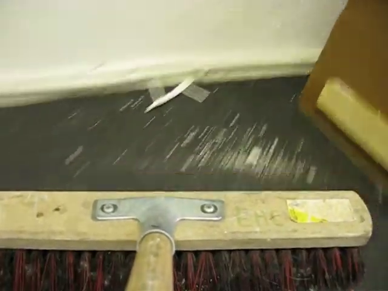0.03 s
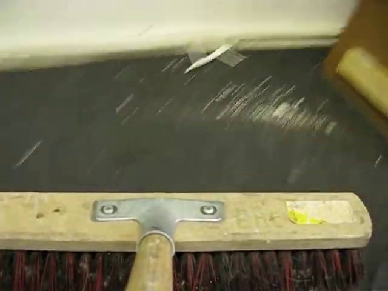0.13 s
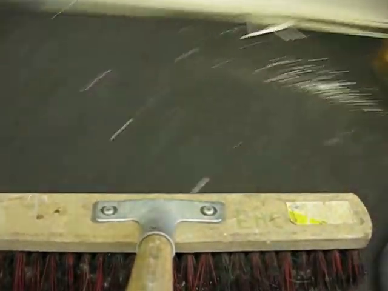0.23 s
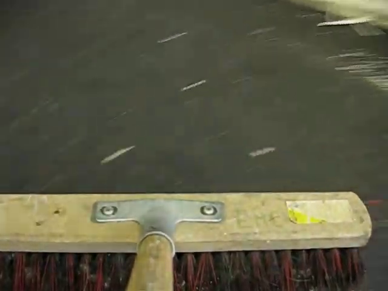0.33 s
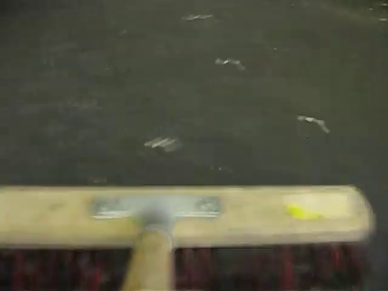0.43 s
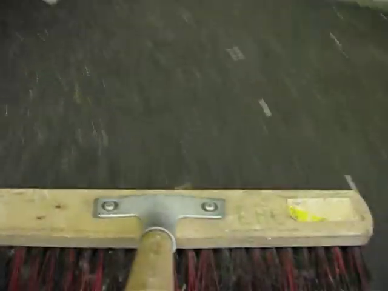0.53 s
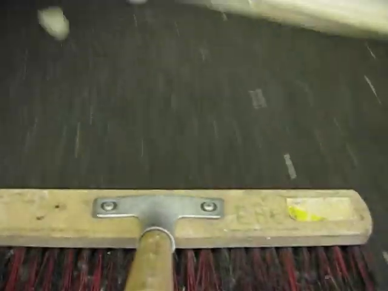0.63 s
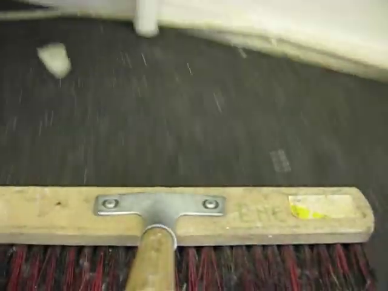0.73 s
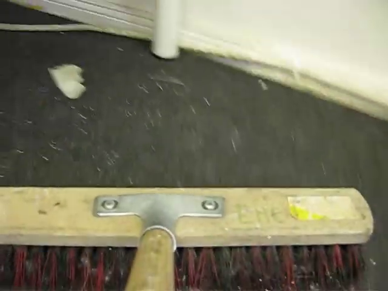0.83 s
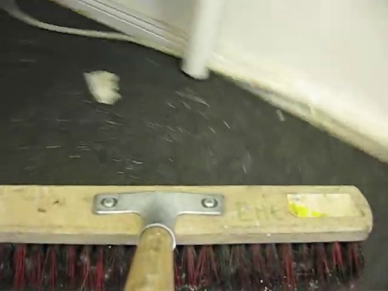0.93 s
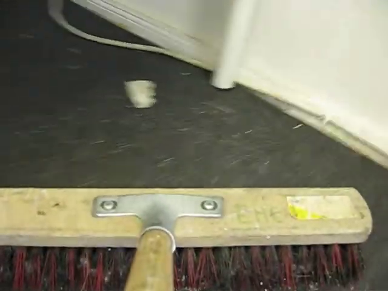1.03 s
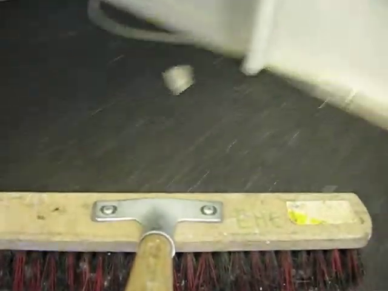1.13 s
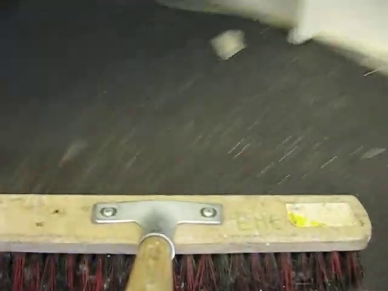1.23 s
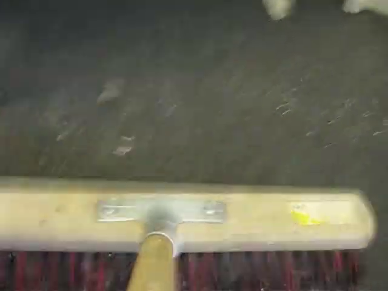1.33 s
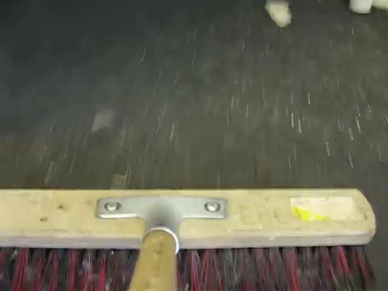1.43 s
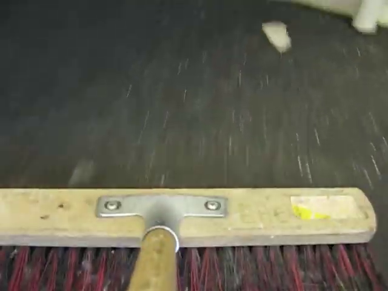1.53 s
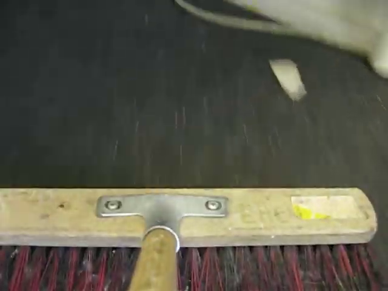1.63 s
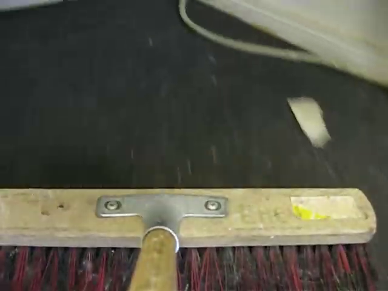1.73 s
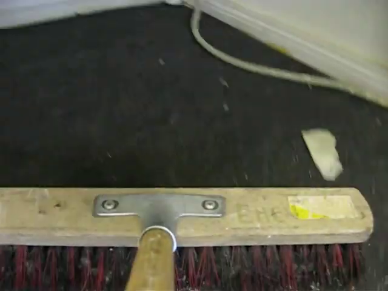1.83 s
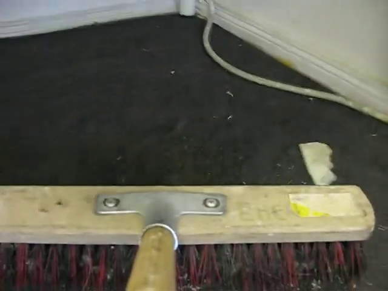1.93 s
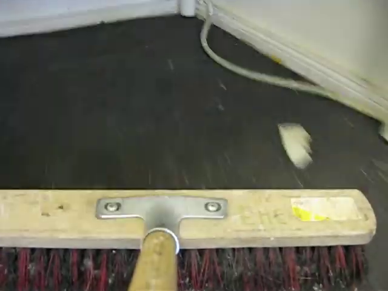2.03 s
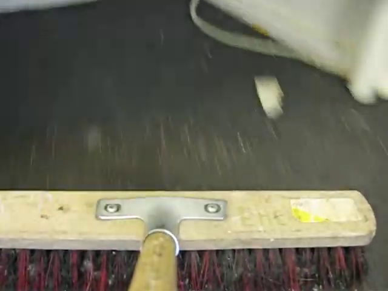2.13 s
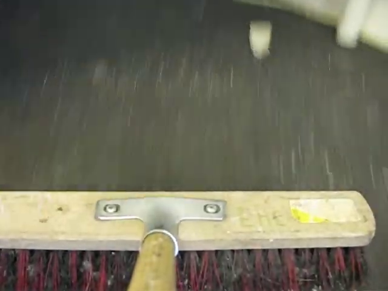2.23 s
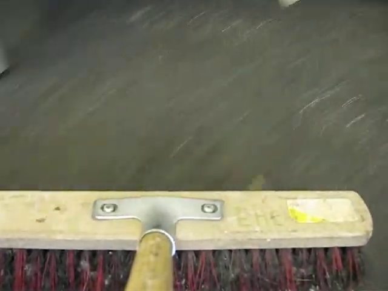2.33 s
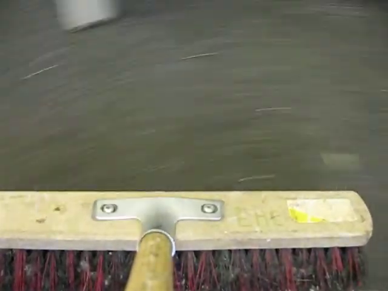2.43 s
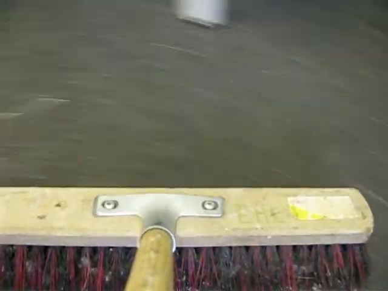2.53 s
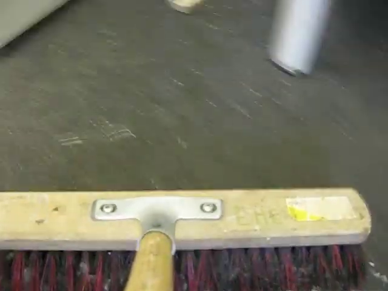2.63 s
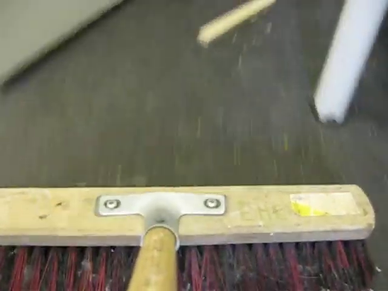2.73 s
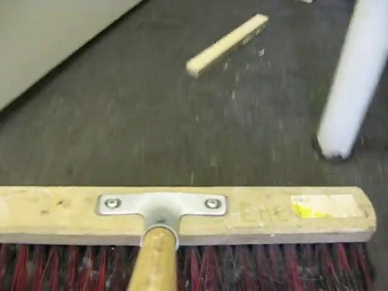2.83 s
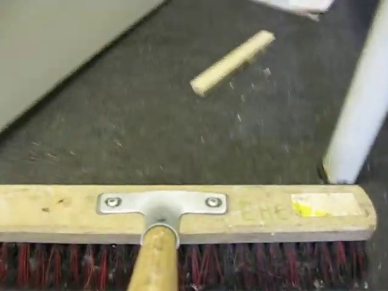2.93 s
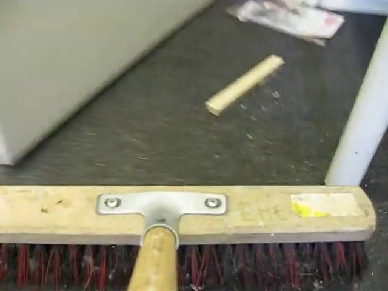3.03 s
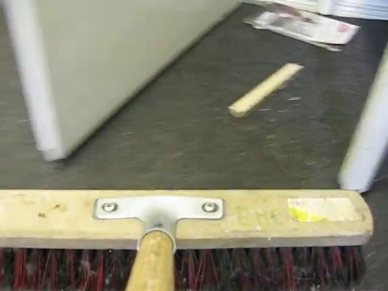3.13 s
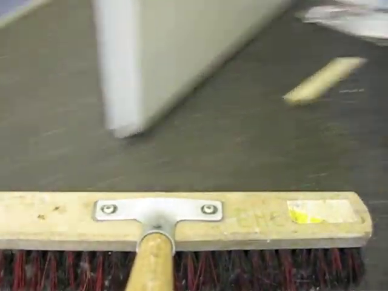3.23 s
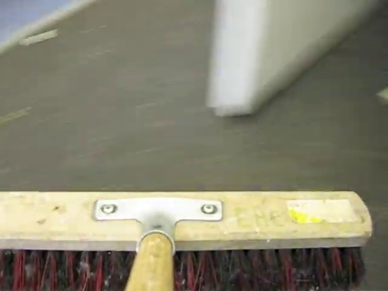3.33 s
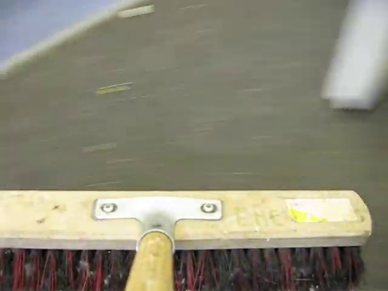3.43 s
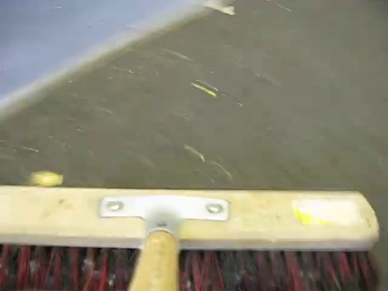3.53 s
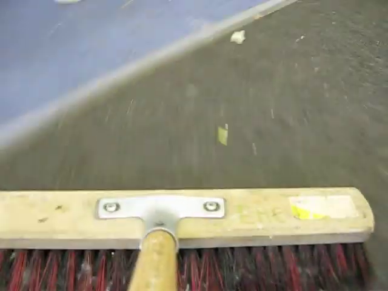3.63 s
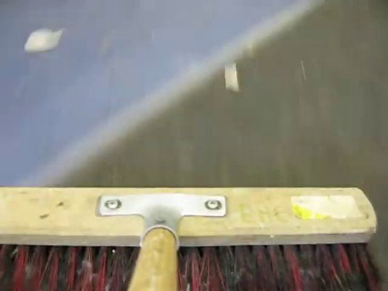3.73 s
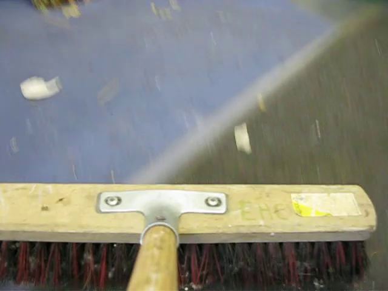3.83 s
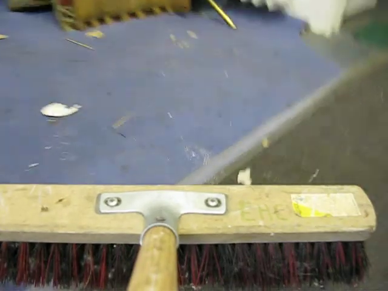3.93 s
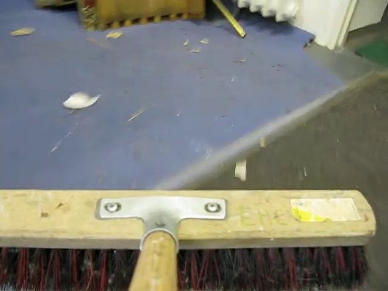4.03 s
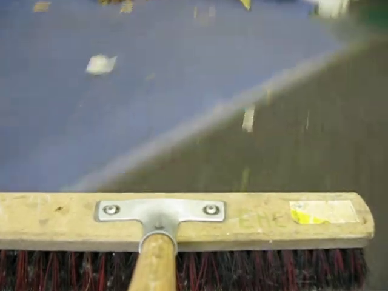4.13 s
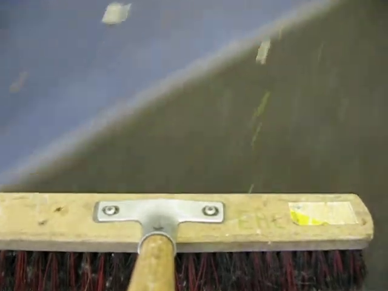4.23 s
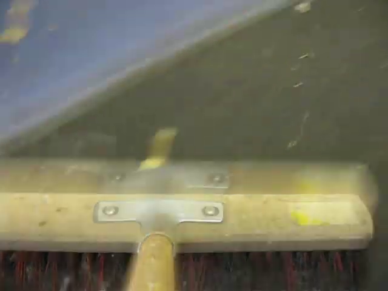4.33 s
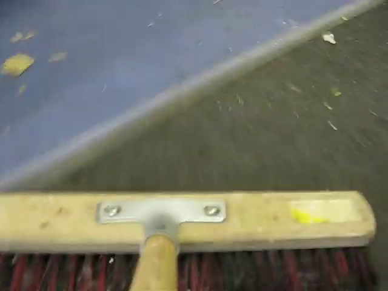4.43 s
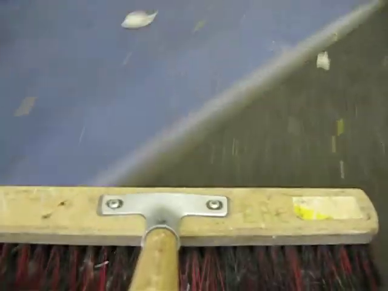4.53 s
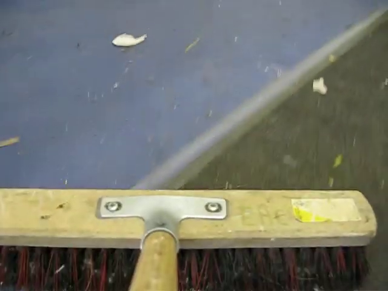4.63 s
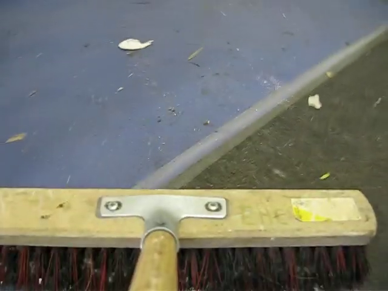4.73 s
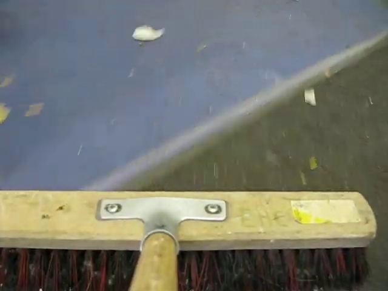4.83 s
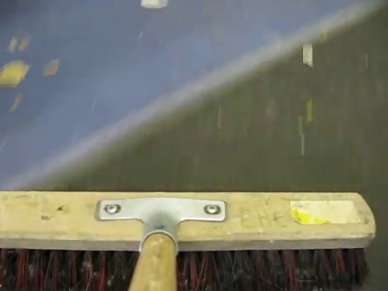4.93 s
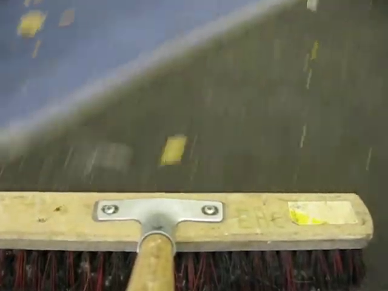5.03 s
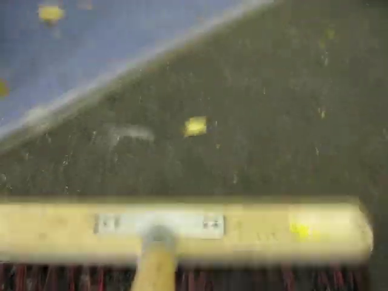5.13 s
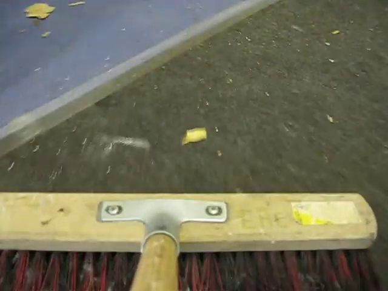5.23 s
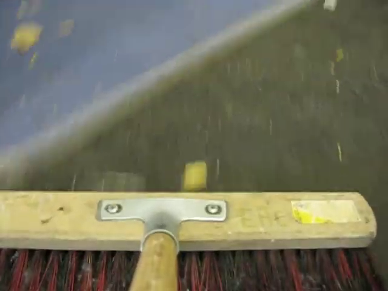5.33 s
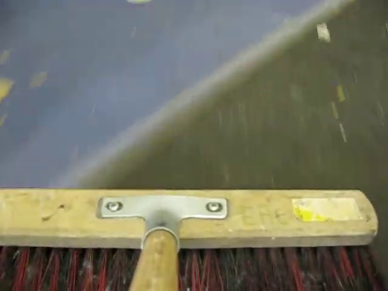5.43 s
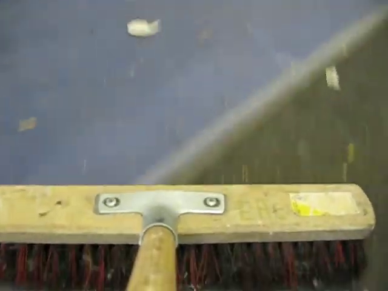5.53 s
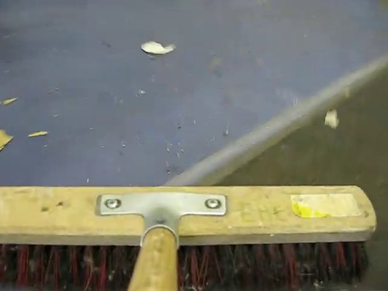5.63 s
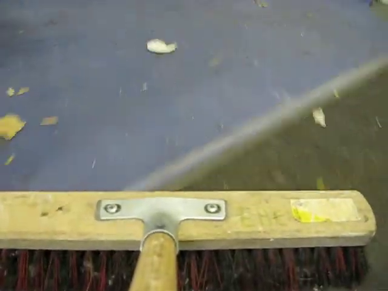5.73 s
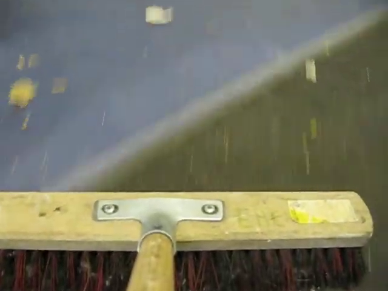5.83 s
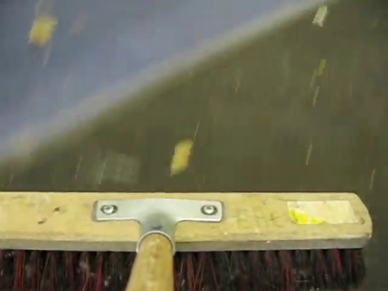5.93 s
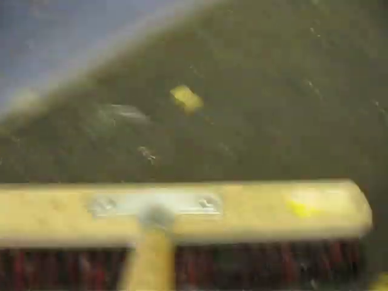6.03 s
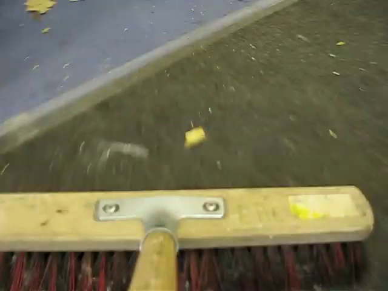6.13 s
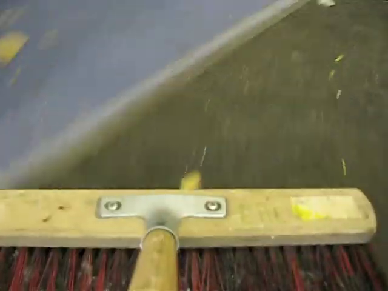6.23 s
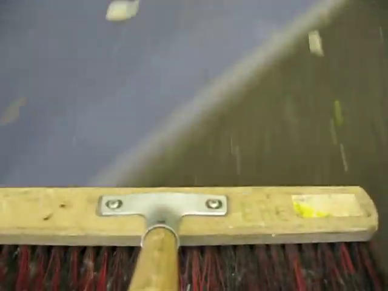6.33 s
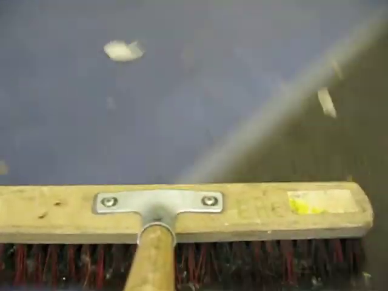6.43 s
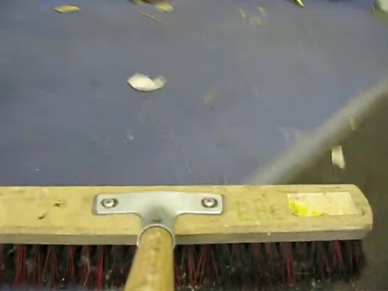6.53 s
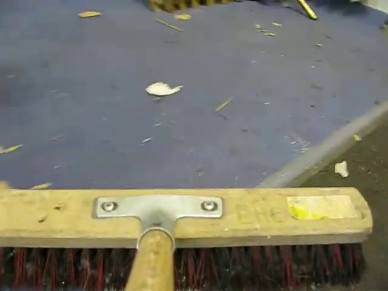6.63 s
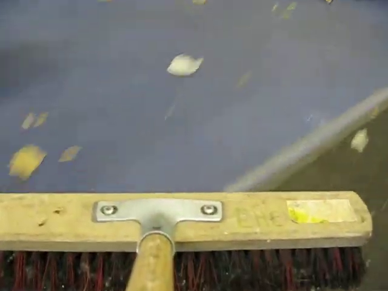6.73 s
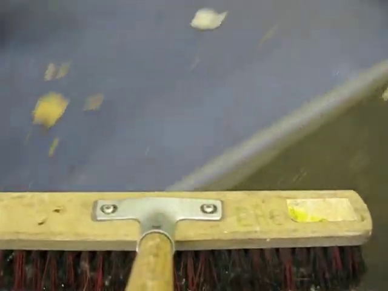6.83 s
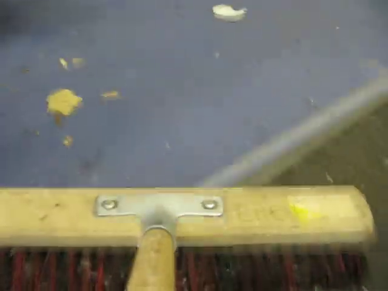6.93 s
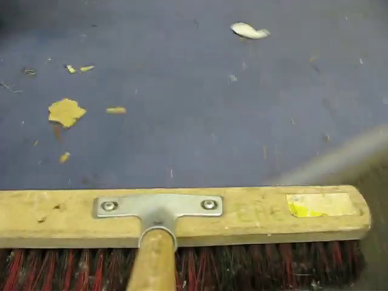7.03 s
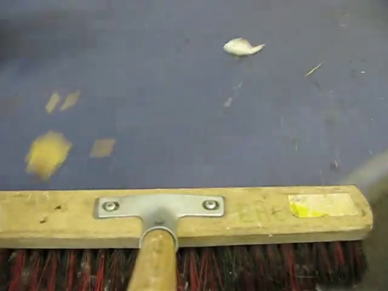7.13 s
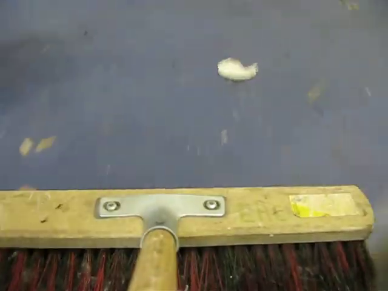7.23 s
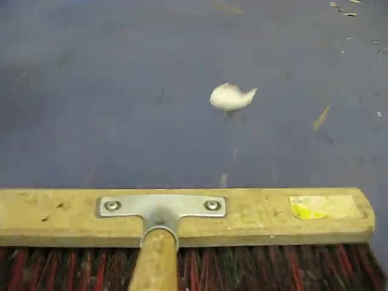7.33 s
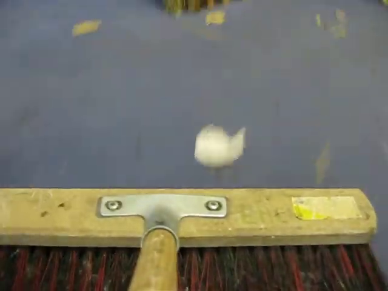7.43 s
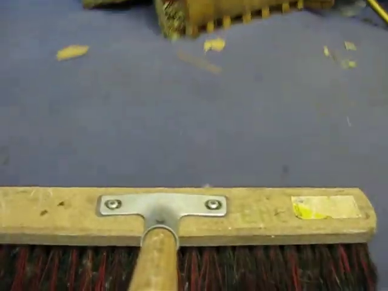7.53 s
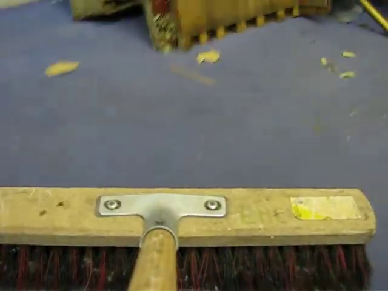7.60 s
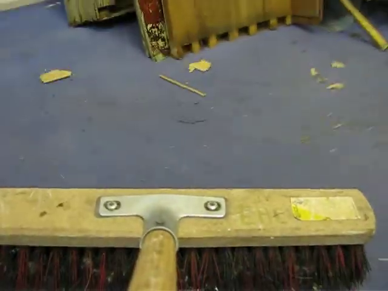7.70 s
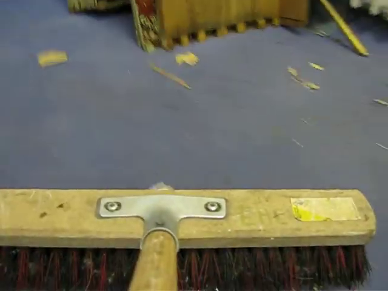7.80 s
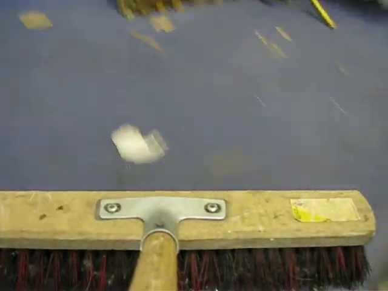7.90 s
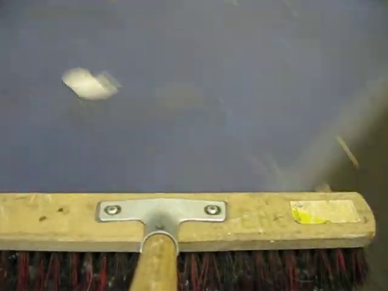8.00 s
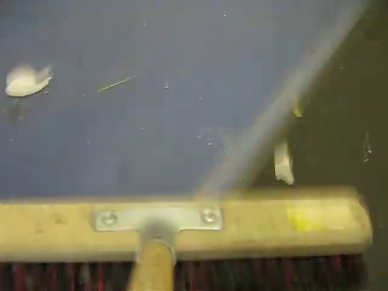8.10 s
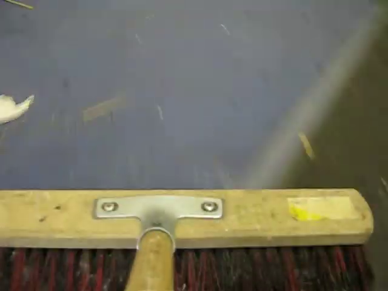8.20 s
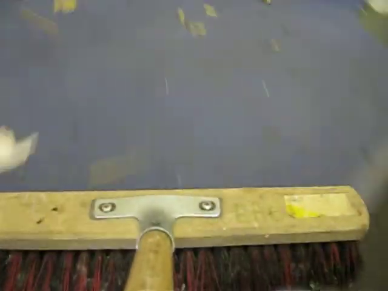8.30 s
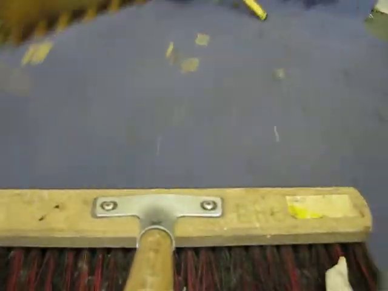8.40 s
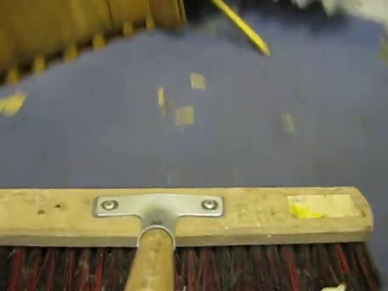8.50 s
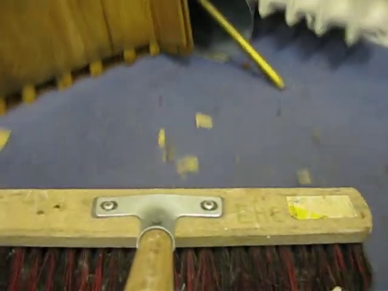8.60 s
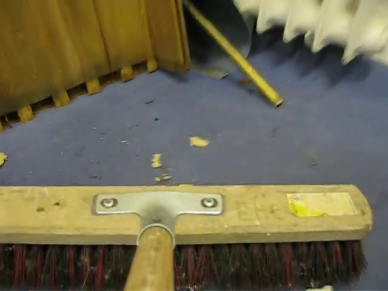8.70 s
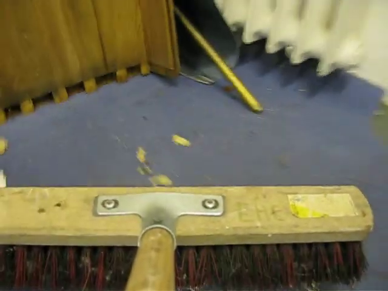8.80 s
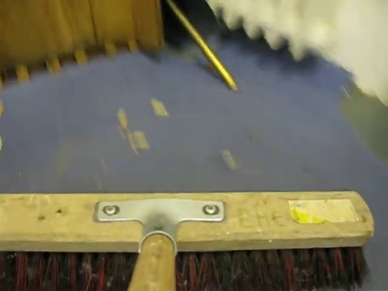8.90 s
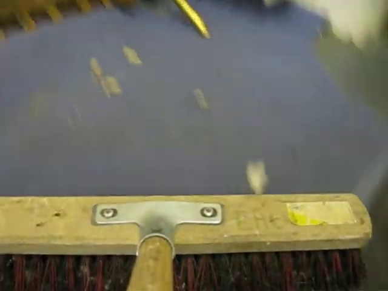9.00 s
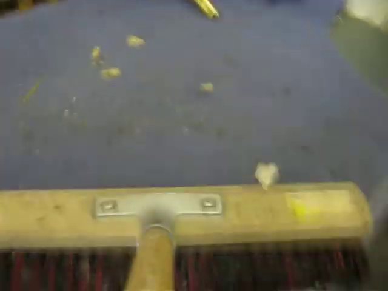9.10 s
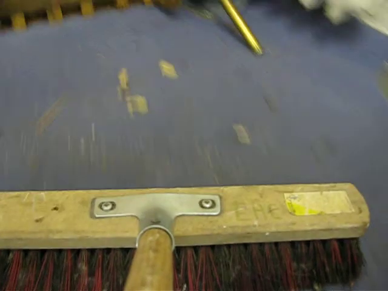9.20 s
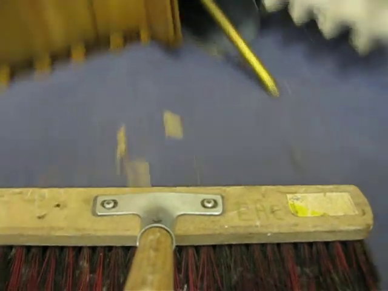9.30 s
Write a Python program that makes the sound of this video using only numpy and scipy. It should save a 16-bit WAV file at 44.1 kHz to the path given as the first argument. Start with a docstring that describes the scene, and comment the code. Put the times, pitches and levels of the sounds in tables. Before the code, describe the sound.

A stiff push broom makes about ten strokes in a small room, first on carpet, then on hard floor, where it sounds hollower. Most begin with a wooden knock, a low thud and a sharp rattle, followed by hissing, scrubbing bristles. Between strokes come faint rustles and thin squeaks. Early on, something clatters once further off. The microphone is close, fixed to the handle.

```python
"""Push broom on carpet and hard floor

A stiff broom sweeps carpet, then hard floor, heard from a mono camera strapped to its handle.
Each stroke starts as the wooden head drops: the handle thuds, the camera mount rattles and the head
knocks, then bristles hiss and scrub. As the broom is carried back the mount rustles, with thin squeaks.
Something falls once further off in the small room."""
import sys
import numpy as np
from scipy import signal
from scipy.fft import rfft, irfft, next_fast_len
from scipy.io import wavfile
from scipy.ndimage import uniform_filter1d, map_coordinates

SR = 44100
rng = np.random.default_rng(int(sys.argv[2]) if len(sys.argv) > 2 else 0)


def persist_wave(psi):
    """Save psi, clipped to +-1, as 16-bit WAV."""
    counts = np.round(np.clip(psi, -1, 1) * 32767).astype(np.int16)
    wavfile.write(sys.argv[1], SR, np.atleast_2d(counts).T)


N = 412776


def amp(db):
    """Decibels to gain."""
    return 10 ** (np.asarray(db) / 20)


def unit(x):
    """x at rms 1."""
    return x / np.sqrt(np.mean(x ** 2) + 1e-20)


def along(points, hz):
    """Interpolate (Hz, value) points on a log axis."""
    f, v = np.transpose(points)
    return np.interp(np.log(hz + 1), np.log(f + 1), v)


def curves(rows):
    """One value per sample for each column after the time."""
    s, *cols = np.transpose(rows)
    return np.array([np.interp(np.arange(N) / SR, s, c) for c in cols])


def gains(tables, fade_s):
    """Summed, smoothed gains of (s, dB, ..) tables, each silent outside its span."""
    total = np.zeros((len(tables[0][0]) - 1, N))
    for rows in tables:
        s, *cols = np.transpose(rows)
        span = np.arange(max(round(s[0] * SR), 0), min(round(s[-1] * SR), N))
        total[:, span] += amp([np.interp(span / SR, s, c) for c in cols])
    return uniform_filter1d(total, int(fade_s * SR) + 1, axis=1)


def wobble(rate_hz):
    """A smooth random curve with knots at rate_hz."""
    knots = rng.standard_normal(int(N * rate_hz / SR) + 4)
    return map_coordinates(knots, [np.arange(N) * rate_hz / SR])


def filtered(x, response):
    """x through a complex frequency response."""
    size = next_fast_len(N + SR // 2)
    return irfft(rfft(x, size) * response(np.fft.rfftfreq(size, 1 / SR)), size)[..., :N]


def coloured(x, spectrum):
    """x shaped by (Hz, dB) points, at rms 1."""
    return unit(filtered(x, lambda hz: amp(along(spectrum, hz))))


def resonances(modes):
    """Causal response of (Hz, width Hz, dB) modes of alternating sign."""
    return lambda f: sum((-1) ** k * amp(db) * 1j * f * width / (hz * hz - f * f + 1j * f * width)
                         for k, (hz, width, db) in enumerate(modes))


def rung(x, modes, order=1):
    """x through resonances whose powers add, each applied order times, at rms 1."""
    def response(f):
        return np.sqrt(sum(amp(2 * db) * abs(resonances([(hz, width, 0)])(f)) ** (2 * order)
                           for hz, width, db in modes))
    return unit(filtered(x, response))


def flicks(grain_db, patchy_db):
    """Dense flicks: noise whose level jumps about every millisecond, in time-frequency patches."""
    grains = rng.standard_normal(N) * amp(grain_db * wobble(900))
    spectra = signal.stft(grains, nperseg=512)[2]
    patches = uniform_filter1d(uniform_filter1d(rng.standard_normal(spectra.shape), 8, 0), 8, 1)
    return signal.istft(spectra * amp(patchy_db * unit(patches)), nperseg=512)[1][:N]


def scattered(spans, db):
    """One random event per span: time in seconds, level within 4 dB of db, spread within +-1.75."""
    start, end = np.array(spans)[:, :2].T
    when, level, spread = rng.random((len(start), 3)).T
    return np.c_[start + (end - start) * when, db + 8 * (level - .5), 3.5 * (spread - .5)]


def bursts(events):
    """Seconds around each event's peak, and the matching track samples."""
    step = np.arange(-300, 900)
    return step / SR, np.clip(np.round(events[:, :1] * SR).astype(int) + step, 0, N - 1)


def placed(samples, sounds):
    """Sum bursts into one track."""
    return np.bincount(samples.ravel(), sounds.ravel(), N)


def add(track, s, sound):
    """Mix a sound into the track at s seconds."""
    track[round(s * SR):][:len(sound)] += sound


# Broom in the air. Each row: start and end in seconds, first and last rustle in dB, murmur in dB.
LIFTS = [(0, .34, -54, -58, -48.5), (.858, 1.24, -47, -60.5, -48), (1.8, 2.44, -49, -59, -46),
         (2.92, 3.477, -51, -67, -46.5), (3.86, 4.31, -48, -57.5, -43.5), (4.683, 5.07, -51, -58, -46),
         (5.603, 5.98, -50, -60, -48), (6.502, 6.85, -50.5, -57, -48), (7.7, 8.05, -55.5, -60, -48.5),
         (8.717, 9.019, -58, -49, -47)]
# Each row: centre in Hz, width in Hz, level in dB.
RUSTLE_MODES = [(3270, 1600, -7), (4430, 270, -8), (5320, 150, 2), (6600, 560, 2), (7970, 680, -1.5),
                (11200, 3100, -9.5), (14900, 1100, -8)]
# Each row: frequency in Hz, density in dB.
MURMUR_SPECTRUM = [(88, -47), (150, -7.5), (315, -9), (356, -2), (557, -2.5), (611, 0.5), (782, -5),
                   (1300, -3), (6000, -18.5), (7800, -56), (13200, -120)]


def mount_rustle():
    """The mount rustles in quick puffs over a dull murmur; both levels glide on between lifts."""
    puff_hz, puff_db, murmur_fade_db = 27, 2.5, 2.5
    levels = [row for start, end, first, last, db in LIFTS
              for row in [(start, first, db), (end, last, db - murmur_fade_db)]]
    rustle_gain, murmur_gain = amp(curves(levels))
    puff_phase = 2 * np.pi * np.cumsum(puff_hz * (1 + .35 * wobble(11))) / SR
    puffs = np.sin(puff_phase) * (1 + wobble(3.5))
    rustle = amp(puff_db * puffs) * rung(flicks(grain_db=2.5, patchy_db=2.0), RUSTLE_MODES)
    murmur = coloured(flicks(grain_db=0.2, patchy_db=1.5), MURMUR_SPECTRUM)
    return rustle_gain * unit(rustle) + murmur_gain * murmur


# Each row: start in seconds, release in seconds, level in dB.
GRAZES = [(0, 0.155, -44), (0.887, 1.023, -42.5)]
# Each row: frequency in Hz, density in dB.
GRAZE_SPECTRUM = [(1500, -28), (4000, -9.5), (7600, 0), (9500, -6.5), (12500, -2.5), (16000, -9.5)]


def grazes():
    """Bristle tips graze the floor on the way back, over a faint steady hiss of the same colour."""
    hiss_db = -59
    levels = [[(start, db), (end, db - 5.5), (end + 0.046, db - 26)] for start, end, db in GRAZES]
    graze_gain = gains(levels, fade_s=.02)[0]
    return (graze_gain + amp(hiss_db)) * coloured(rng.standard_normal(N), GRAZE_SPECTRUM)


# Each row: start in seconds, level in dB, pitch in Hz, lower and upper ring in dB, rumble jolt in dB.
THUDS = [(0.352, -14, 151.6, -41, -50, 4), (.414, -13, 135, -29, -50, 0), (.883, -31, 75, -53, -55, 1),
         (1.328, -18, 141, -43, -43, 20), (1.344, -13, 110.3, -27, -45, 3), (2.584, -20, 170, -55, -50, 4),
         (2.999, -30.5, 93, -57, -45, 5), (3.496, -16, 99, -34, -45, 13), (4.11, -35.5, 114, -58, -46, 0),
         (4.327, -11, 119, -45, -24.5, 15), (5.083, -12, 172, -45, -29, 15), (5.13, -20, 120, -50, -41, 0),
         (5.503, -45, 115, -60, -44, 0), (5.99, -19, 140, -50, -31.5, 7), (6.873, -11, 136, -36, -35, 20.5),
         (8.057, -20.5, 110, -45, -36, 3), (9.032, -14.5, 75, -45, -45, 12)]
# Each row: frequency in Hz, T60 in seconds.
HANDLE_MODES = [(57.5, 0.57), (97, 0.55)]
# Each row: centre in Hz, width in Hz, level in dB.
RUMBLE_MODES = [(35, 40, -3), (57, 18, 5), (107, 12.5, 3.5), (140, 47, -15)]
# Rumble between jolts. Each row: time in seconds, level in dB.
RUMBLE_LEVELS = [(0, -48.5), (.73, -53), (1.17, -48), (1.8, -53), (2.1, -53.5), (3.1, -52.5), (3.95, -56),
                 (4.15, -44.5), (4.85, -54.5), (5.5, -52), (5.8, -51.5), (6.3, -57), (6.8, -52),
                 (7.4, -50.5), (8.65, -59), (8.8, -46), (9.36, -48.5)]


def handle():
    """The handle carries a lumpy rumble, low thuds and its own ring straight into the microphone."""
    thud_t60_s, attack_s, jolt_rise_s, jolt_decay_s = 0.061, 0.0038, 0.011, 0.23
    thuds, jolt_db = np.zeros((2, N + SR))
    t = np.arange(SR) / SR
    for s, db, hz, *rings_db, jolt in THUDS:
        parts = [(db, hz, thud_t60_s)] + [(ring, *mode) for ring, mode in zip(rings_db, HANDLE_MODES)]
        thud = sum(amp(level - 60 * t / t60) * np.sin(2 * np.pi * f * t) for level, f, t60 in parts)
        add(thuds, s, thud * (1 - np.exp(-t / attack_s)))
        add(jolt_db, s, jolt * (1 - np.exp(-t / jolt_rise_s)) * np.exp(-t / jolt_decay_s))
    rumble = amp(3.5 * wobble(9.9)) * rung(rng.standard_normal(N), RUMBLE_MODES)
    return thuds[:N] + amp(curves(RUMBLE_LEVELS)[0] + jolt_db[:N]) * unit(rumble)


# Each row: start and end in seconds, first and last pitch in Hz, level in dB.
THIN_TONES = [(.185, .3, 10900, 9950, -59), (.21, .31, 12200, 11400, -57), (2.17, 2.24, 12600, 11900, -62),
              (2.19, 2.25, 14500, 13800, -59), (2.278, 2.37, 12900, 14100, -54),
              (2.39, 2.43, 14100, 13100, -59), (4.2, 4.32, 6900, 6900, -61),
              (6.63, 6.78, 11200, 12600, -59), (4.1, 4.19, 10300, 12000, -53),
              (4.182, 4.323, 6000, 6000, -51), (8.81, 8.847, 6000, 6000, -55),
              (8.865, 8.98, 13600, 13800, -55), (.95, 1.12, 1490, 1485, -53.5), (.96, 1.12, 849, 845, -52),
              (9.03, 9.037, 2650, 2650, -26)]


def thin_tones():
    """Thin squeaks, two faint steady tones, and a brief ring at the last landing."""
    track = np.zeros(N)
    flutter = amp(2 * wobble(90))
    for start, end, first_hz, last_hz, db in THIN_TONES:
        count = int((end - start) * SR)
        hz = np.linspace(first_hz, last_hz, count) * (1 + .12 * rng.standard_normal(count))
        tone = np.sin(2 * np.pi * np.cumsum(hz) / SR) * np.sqrt(np.hanning(count))
        add(track, start, amp(db) * tone * flutter[round(start * SR):][:count])
    return track


# The head touches down. Each row: start and end in seconds, crunch in dB.
LANDINGS = [(0.345, 0.464, -36.5), (1.326, 1.363, -27.5), (1.371, 1.42, -31.5), (3.493, 3.558, -29),
            (4.323, 4.403, -29), (5.075, 5.169, -33.5), (5.183, 5.206, -35), (5.987, 6.022, -26.5),
            (6.047, 6.12, -35.5), (6.856, 6.945, -28.5), (8.051, 8.088, -26), (8.086, 8.151, -32),
            (9.033, 9.046, -20), (9.061, 9.096, -35)]
# One table per stroke, plus a short dull scuff before the second landing.
# Each row: time in seconds, then tip hiss, scrub and boom in dB.
STROKES_AND_SCUFF = [
    [(0.46, -31, -37, -33), (0.484, -24.5, -34, -36.5), (0.738, -23, -29.5, -37), (0.782, -26.5, -34, -36),
     (0.818, -40, -43, -62), (0.83, -40, -42.5, -55)],
    [(1.42, -27, -34.5, -34), (1.51, -23.5, -31.5, -35), (1.692, -24.5, -32.5, -35.5),
     (1.742, -25.5, -33.5, -31.5), (1.77, -30.5, -42, -46), (1.8, -43.5, -43.5, -65)],
    [(2.46, -39, -36, -44), (2.494, -26.5, -34, -41), (2.542, -31, -31.5, -44), (2.628, -23.5, -32, -38),
     (2.856, -27, -33.5, -33), (2.91, -43, -49, -58)],
    [(3.555, -28.5, -44, -39), (3.581, -28, -34, -42), (3.657, -21.5, -28.5, -36), (3.683, -26, -35, -54),
     (3.737, -23, -27.5, -36), (3.83, -39.5, -39, -54)],
    [(4.4, -28, -34, -45), (4.422, -23.5, -28, -40), (4.472, -22, -26.5, -32), (4.496, -23, -29, -41),
     (4.576, -28.5, -30, -34.5), (4.65, -44, -40.5, -60)],
    [(5.21, -35, -45, -23), (5.22, -32, -46, -51), (5.338, -23.5, -28, -36), (5.454, -23, -29, -40),
     (5.57, -40.5, -39, -54), (5.58, -44, -41, -59)],
    [(6.12, -31.5, -37, -49), (6.144, -27, -35, -49), (6.178, -25.5, -34.5, -36),
     (6.238, -22, -27.5, -37.5), (6.388, -26.5, -29, -38), (6.46, -43, -40.5, -51)],
    [(6.95, -30, -32.5, -35), (7.008, -30, -35, -41), (7.074, -23.5, -28.5, -41), (7.164, -27, -25, -35),
     (7.308, -25, -24.5, -35.5), (7.348, -22, -32, -35.5), (7.384, -29, -25.5, -34),
     (7.402, -28, -23.5, -32), (7.542, -28.5, -23.5, -31.5), (7.578, -33, -31.5, -36),
     (7.63, -50, -42, -60)],
    [(8.15, -32, -33, -45), (8.168, -28, -28.5, -36), (8.216, -22, -25, -33), (8.27, -26, -29.5, -45),
     (8.298, -30, -24.5, -34), (8.348, -26.5, -22.5, -29), (8.426, -27.5, -23, -37),
     (8.454, -28, -22.5, -32.5), (8.602, -28, -24, -35), (8.642, -33.5, -30.5, -43),
     (8.68, -48, -38.5, -53)],
    [(1.25, -53, -53, -56), (1.264, -55, -38.5, -44), (1.315, -49, -45, -47)],
    [(9.1, -27, -35, -36), (9.114, -29, -27.5, -37.5), (9.355, -26, -21, -32)],
]
# Each row: time in seconds, share of hard floor under the bristles from 0 to 1.
HARD_SHARE = [(3.3, 0.1), (4.2, 0.8), (6.5, 0.66), (6.9, 0.96)]
# Each row: frequency in Hz, density in dB.
TIP_SPECTRUM = [(1590, -26), (2700, -2.5), (3500, -1), (5050, -4), (10200, -6.5), (11800, -5.5),
                (14600, -10), (16000, -15)]
# Head modes on each surface. Each row: centre in Hz, width in Hz, level in dB.
CARPET_MODES = [(241, 86, -7.5), (319, 88, -4.5), (437, 44, 1), (562.6, 91, -0.5), (692, 125, 0.5),
                (1000, 860, -7.5), (1302, 110, -3), (1640, 310, -2), (2037, 380, -3), (2440, 350, -6.5)]
HARD_FLOOR_MODES = [(238, 137, -8.5), (421, 102, -0.5), (727, 160, -4.5), (835, 204, 1), (1017, 380, -2.5),
                    (1340, 860, -4), (2170, 2000, -9.5)]


def sweep_gains():
    """Gains of hiss, scrub and boom, faded at both ends of each stroke and of the scuff."""
    onset_s, release_s, drop_db = 0.034, 0.12, 20
    tables = []
    for rows in STROKES_AND_SCUFF:
        (start, *first), (end, *last) = rows[0], rows[-1]
        lead_in = (start - onset_s, *np.subtract(first, drop_db))
        lead_out = (end + release_s, *np.subtract(last, drop_db))
        tables.append([lead_in, *rows, lead_out])
    return gains(tables, fade_s=0.0086)


def head_resonance(drag, low_hz, high_hz):
    """Bristle drag shakes the wooden head's modes in one band, hollower on hard floor."""
    hard = np.clip(curves(HARD_SHARE)[0], 0, 1)
    carpet = [mode for mode in CARPET_MODES if low_hz <= mode[0] < high_hz]
    floor = [mode for mode in HARD_FLOOR_MODES if low_hz <= mode[0] < high_hz]
    on_carpet, on_floor = rung(drag, carpet, order=2), rung(drag[::-1], floor, order=2)
    return np.sqrt(1 - hard) * on_carpet + np.sqrt(hard) * on_floor


def bristles():
    """Bristles crunch on landing, then sweep: the tips hiss, the head scrubs and booms."""
    split_hz = 560
    hiss_gain, scrub_gain, boom_gain = sweep_gains()
    judder = amp(0.85 * wobble(25))  # bristle rows catch and let go together
    tips = coloured(flicks(grain_db=1.0, patchy_db=1.0), TIP_SPECTRUM)
    drag = flicks(grain_db=1.5, patchy_db=1.0)
    scrub = head_resonance(drag, split_hz, np.inf)
    boom = head_resonance(drag, 0, split_hz)
    sweep = judder * (hiss_gain * tips + scrub_gain * scrub + boom_gain * boom)
    crunch_levels = [[(start - .004, db - 17.5), (start + 0.0093, db), (end, db - 8.5)]
                     for start, end, db in LANDINGS]
    crunch_gain = gains(crunch_levels, fade_s=0.004)[0] * amp(4.5 * wobble(150))
    return sweep + crunch_gain * (tips + 0.74 * scrub + 0.48 * boom)


# Each row: peak time in seconds, level in dB, lower modes over upper modes in dB.
RATTLES = [(.357, -5, 1), (.37, -8, 6), (.3765, -5.5, 0), (.394, -8, -16), (.411, -7, -3),
           (.452, -10.5, -6), (.48, -16, -6), (1.257, -22, 5), (1.3327, -10, 5), (1.3418, -4.5, 4),
           (1.3517, -5, -2), (1.381, -14, 0), (1.3866, -7.5, -4), (1.409, -7.5, 0), (2.139, -32, 2),
           (2.318, -38, -6), (2.597, -6, 2), (2.613, -6, 3), (2.633, -6, -6), (2.643, -5, -4),
           (2.998, -30, -4), (3.025, -33, -4), (3.05, -28, -7), (3.085, -32, -5), (3.5024, -9.5, -7),
           (3.5303, -2, -4), (3.601, -7, 0), (4.0103, -29, -2), (4.092, -34, -2), (4.138, -37, 4),
           (4.338, -9, -3), (4.367, -1, -7), (4.3902, -10, 1), (5.0894, 6.5, 0.5), (5.1273, -7.5, 1),
           (5.1452, -7, 3), (5.151, -8, 8), (5.1822, -9, -2), (5.531, -16, -3), (5.671, -21.5, 11),
           (5.7736, -31, -2), (5.998, -6, 6), (6.0028, -2, 1.5), (6.048, -5, -2), (6.0557, -11, 3),
           (6.068, -6.5, -4), (6.077, -7.5, 3), (6.018, -12, -3), (6.086, -13, 3), (6.1134, -10, 0),
           (6.861, -14, 0), (6.865, -13, 3), (6.872, -6, -4), (6.901, -3.5, -5), (6.9258, -4, -1),
           (8.0604, -6, 0), (8.0683, -12, -1), (8.0783, -10, 4), (8.1083, -5, -6), (8.123, -5.5, 4),
           (8.132, -9, 5), (8.9634, -24, 0), (9.038, -3.5, -4), (9.0413, 4, -3), (9.076, -5, -4)]
# Lower set, then upper set. Each row: centre in Hz, width in Hz, level in dB.
MOUNT_MODES = [
    [(2000, 1240, -6), (4180, 790, -4.5), (5070, 840, -2.5)],
    [(6580, 480, -3), (7850, 1500, -2.5), (9030, 2700, -6.5), (12600, 4400, -18)],
]


def mount_rattles():
    """The loose mount chatters in spikes of noise, with a random extra one per lift and landing."""
    extras = np.r_[scattered(LIFTS, db=-34), scattered(LANDINGS, db=-12)] * [1, 1, 3]
    rows = np.r_[RATTLES, extras]
    db, tilt_db = rows[:, 1:2], rows[:, 2:]
    t, samples = bursts(rows)
    width_s = np.clip(0.0019 - 0.03 * db, .0005, 0.0038)  # the hardest rattles are shortest
    envelope = np.exp(np.where(t < 0, 2.9 * t, -1.5 * t) / width_s)
    chatter = rng.standard_normal(samples.shape) * envelope * amp(db)
    lower = placed(samples, chatter * amp(tilt_db / 2))
    upper = placed(samples, chatter * amp(-tilt_db / 2))
    return filtered(lower, resonances(MOUNT_MODES[0])) - filtered(upper, resonances(MOUNT_MODES[1]))


# Each row: peak time in seconds, level in dB, pitch in Hz.
KNOCKS = [(.3597, -12, 800), (.3665, -5, 1430), (.3705, -11, 1900), (.4005, -18, 380), (.418, -16, 200),
          (.4386, -12.5, 780), (.509, -22.5, 249), (1.254, -30.5, 1400), (1.3317, -12, 397),
          (1.3421, -2.5, 1480), (1.3517, -8, 1220), (1.373, -17, 420), (1.388, -19, 330), (1.411, -20, 200),
          (1.445, -22.5, 160), (2.596, -22.5, 220), (2.6008, -17, 1070), (3.5075, -13.5, 1150),
          (3.515, -24.5, 220), (3.567, -17, 650), (4.3301, -9.5, 620), (4.3343, -3, 1500),
          (4.338, -8, 2100), (4.3428, -12, 910), (5.0865, -8.5, 680), (5.092, -11.5, 300),
          (5.0966, -16, 640), (5.1214, -20, 560), (5.1294, -15.5, 432), (5.1533, -12.5, 1300),
          (5.1966, -18.5, 700), (5.672, -26.5, 1290), (5.9945, -11.5, 805), (6.003, -7.5, 1670),
          (6.007, -9, 1300), (6.0565, -16, 1080), (6.0605, -13.5, 353), (6.077, -18, 1360),
          (6.085, -27, 350), (6.178, -23.5, 200), (6.8668, -15, 760), (6.8745, -8, 1600), (6.885, -16, 900),
          (6.9075, -15, 500), (6.9255, -13, 1560), (8.064, -12.5, 684), (8.0743, -9.5, 930),
          (8.1076, -16, 1220), (8.1288, -13.5, 1240), (8.17, -19, 450), (9.0335, -11, 806),
          (9.0418, -10.5, 1240), (9.0529, -17, 950), (9.079, -21.5, 310), (9.099, -19.5, 420)]
# The head's low thump. Each row: centre in Hz, width in Hz, level in dB.
THUMP_MODES = [(285, 250, -1.5)]


def head_knocks():
    """Dead wooden blows roughened by splintery contact, with a soft random one per landing."""
    soft_db, soft_hz = -22.5, 870
    s, db, spread = scattered(LANDINGS, soft_db).T
    rows = np.r_[KNOCKS, np.c_[s, db, soft_hz * np.exp(.4 * spread)]]
    t, samples = bursts(rows)
    cycles = t * rows[:, 2:]
    noise = rng.standard_normal(samples.shape)
    tone = np.sin(2 * np.pi * cycles + 3 * noise[:, :1])
    splinters = 0.35 * unit(uniform_filter1d(noise, size=12, axis=1))
    envelope = amp(rows[:, 1:2]) * np.exp(np.where(t < 0, 12.0 * cycles, -.85 * cycles))
    push = placed(samples, envelope * np.sign(noise[:, 1:2]))  # one-way force of each blow
    return placed(samples, envelope * (tone + splinters)) + filtered(push, resonances(THUMP_MODES))


# Each row: frequency in Hz, T60 in seconds.
ROOM_DECAY = [(250, 0.34), (700, 0.49), (1300, 0.52), (2500, 0.4), (5000, 0.36), (12000, 0.27)]


def room(x):
    """Small-room reverberation; each frequency dies at its own speed."""
    hz, t, spectra = signal.stft(rng.standard_normal(SR // 2), SR, nperseg=256)
    decay = amp(-60 * t / along(ROOM_DECAY, hz)[:, None])
    tail = signal.istft(spectra * decay, SR, nperseg=256)[1]
    return signal.fftconvolve(x, tail / np.linalg.norm(tail))[:N]


# Each row: time in seconds, impulse level in dB.
FALL_BLOWS = [(1.968, 14), (1.978, 19.3), (2.003, 13.7), (2.028, 12)]
# Each row: frequency in Hz, gain in dB.
FALL_SPECTRUM = [(240, -20.5), (400, -10), (524, -14), (707, -6), (1000, -15), (1150, -5), (1400, -7),
                 (1550, -9), (2000, -10), (2620, -14.5), (4370, -17.5), (7090, -31), (12000, -32),
                 (15600, -66), (22000, -120)]
# The fallen thing's ring. Each row: centre in Hz, width in Hz, gain per pass in dB.
FALL_MODES = [(1190, 75, -1), (1340, 80, -2)]


def far_fall():
    """A far clatter arrives mostly as room sound; two filter passes give its ring a soft onset."""
    blows = np.zeros(N)
    for s, db in FALL_BLOWS:
        blows[round(s * SR)] = amp(db)
    clatter = filtered(room(blows), lambda hz: amp(along(FALL_SPECTRUM, hz)))
    ring = filtered(blows, lambda hz: resonances(FALL_MODES)(hz) ** 2)
    return clatter + ring


# The room's answer to the broom. Each row: frequency in Hz, gain in dB.
REVERB_SPECTRUM = [(300, -12.5), (700, -13), (1300, -11), (2500, -16.5), (6000, -15.5), (12000, -12)]


def scene():
    """Broom, room and fall reach one microphone, on two equal channels."""
    broom = bristles() + head_knocks() + mount_rattles()
    reverb = filtered(room(broom), lambda hz: amp(along(REVERB_SPECTRUM, hz)))
    mono = broom + reverb + handle() + mount_rustle() + thin_tones() + grazes() + far_fall()
    return np.array([mono, mono])


def record(dry):
    """Soft clipping of the loudest blows, then a bass roll-off and a hard band limit."""
    ceiling, bass_hz, top_hz = 0.66, 22, 15900
    clipped = dry / (1 + np.abs(dry / ceiling) ** 6) ** (1 / 6)
    return filtered(clipped, lambda hz: (hz < top_hz) * hz ** 2 / (hz ** 2 + bass_hz ** 2))


dry = scene()
out = record(dry)
persist_wave(out)
```